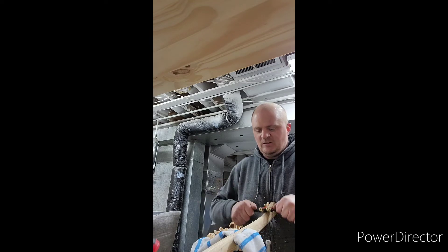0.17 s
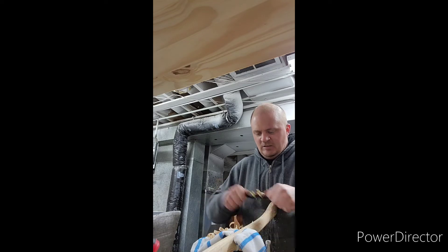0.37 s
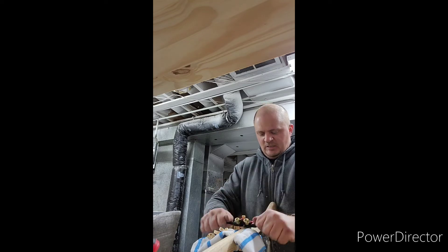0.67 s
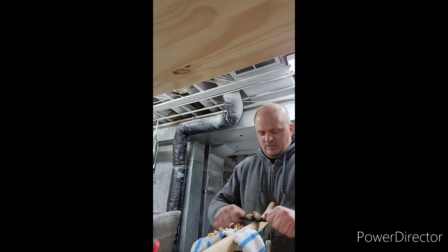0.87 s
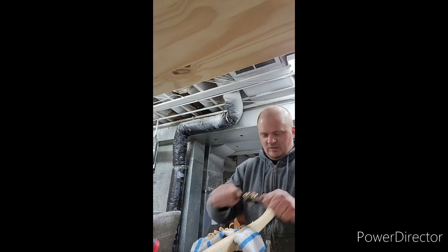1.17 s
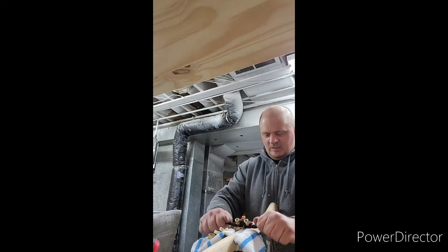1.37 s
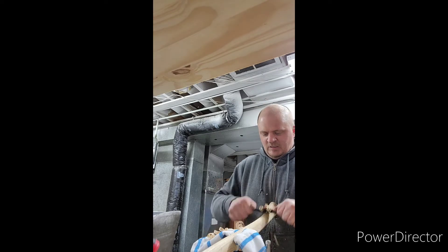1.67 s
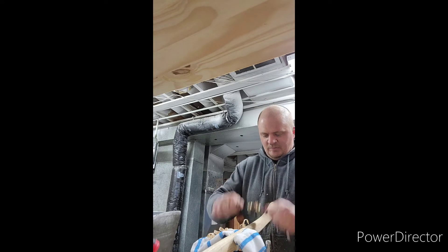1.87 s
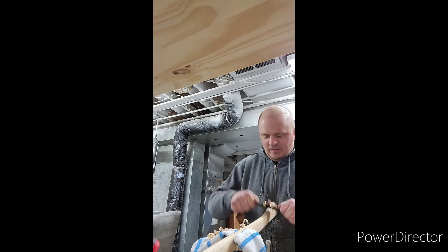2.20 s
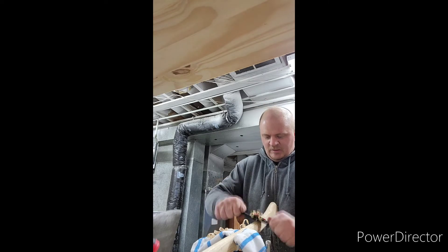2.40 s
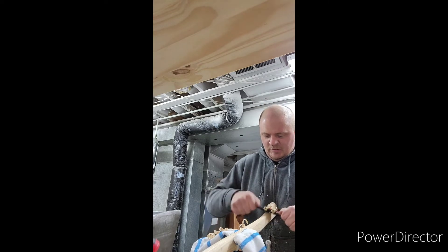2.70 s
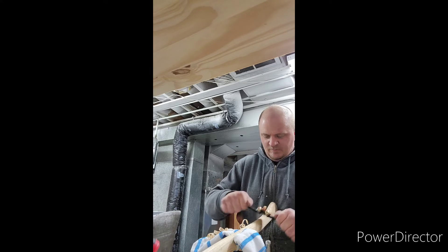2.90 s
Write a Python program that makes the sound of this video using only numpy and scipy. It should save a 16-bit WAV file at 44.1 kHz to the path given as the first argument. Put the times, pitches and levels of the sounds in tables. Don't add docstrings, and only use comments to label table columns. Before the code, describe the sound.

Woodworking scrapes: a hand shave clunks down, then hisses and catches on a clamped wooden handle.

```python
import sys
import numpy as np
from scipy import signal
from scipy.fft import rfft, irfft, next_fast_len
from scipy.io import wavfile

SR = 44100
rng = np.random.default_rng(int(sys.argv[2]) if len(sys.argv) > 2 else 0)


def wav_out(sig):
    wavfile.write(sys.argv[1], SR, np.round(np.clip(np.atleast_2d(sig).T, -1, 1) * 32767).astype(np.int16))


def decibels_to_gain(level_db):
    exponent = np.asarray(level_db, float) / 20
    return 10 ** exponent


N = 134505

# pitch_hz, level_db, t60_s
TOOL_MODES = [(716.3, -6.5, 0.053), (870, -3, 0.022), (1126, 0, 0.021), (1390, -6.5, 0.034),
              (1670, -11, 0.099), (1983, -16.5, 0.016), (2370, -9, 0.044), (2820, 1.5, 0.055),
              (3060, -1.5, 0.052), (3300, -19.5, 0.035), (3650, -9.5, 0.085), (4200, -13, 0.034),
              (4830, -25.5, 0.15), (6740, -38, 0.06)]


def rms_one(x):
    return x / np.sqrt(np.mean(x ** 2) + 1e-20)


def at_hz(points, hz):
    points = np.array(points)
    return np.interp(np.log(hz + 1), np.log(points[:, 0]), points[:, 1])


def coloured(x, spectrum):
    hz = np.fft.rfftfreq(N, 1 / SR)
    low_end = 1 / (1 + (spectrum[0][0] / (hz + 1)) ** 8)
    high_end = 1 / (1 + (hz / spectrum[-1][0]) ** 16)
    return rms_one(irfft(rfft(x) * decibels_to_gain(at_hz(spectrum, hz)) * low_end * high_end, N))


def drift(rate_hz):
    r = np.exp(-2 * np.pi * rate_hz / SR)
    noise = rng.standard_normal(N + SR)
    return rms_one(signal.lfilter([1], [1, -2 * r, r * r], noise)[SR:])


def ring(clicks, hz, t60_s):
    r, w = decibels_to_gain(-60 / (t60_s * SR)), 2 * np.pi * hz / SR
    return signal.lfilter([0, np.sin(w)], [1, -2 * r * np.cos(w), r * r], clicks + 1e-18)


def swell(start_s, level_db, pitch_hz, t60_s, rise_s):
    out, t = np.zeros(N + SR), np.arange(SR // 4) / SR
    for start, db, hz, t60 in np.broadcast(start_s, level_db, pitch_hz, t60_s):
        envelope = decibels_to_gain(db - 60 * t / t60) * (1 - np.exp(-(t / rise_s) ** 2))
        out[int(start * SR):][:len(t)] += envelope * np.sin(2 * np.pi * hz * t)
    return out[:N]


def wide(x):
    likeness = 0.15
    mid = np.sqrt(1 + likeness) * x[0]
    side = np.sqrt(1 - likeness) * x[1] * np.array([[1], [-1]])
    return (mid + side) / np.sqrt(2)


def air():
    # pitch_hz, level_db
    murmur_spectrum = [(30, -6), (140, -1), (900, -22.5), (1100, -29.5), (3300, -34), (6000, -43),
                       (9500, -74.5), (15500, -56)]
    # pitch_hz, likeness (0-1)
    likeness = [(60, 0.84), (240, 1), (950, 0.42), (3770, 0.03), (15000, 0.6)]
    hz = np.fft.rfftfreq(N, 1 / SR)
    alike = np.clip(at_hz(likeness, hz), 0, 1)
    mid, side = rfft(rng.standard_normal((2, N)))
    pair = np.sqrt(1 + alike) * mid + np.sqrt(1 - alike) * side * [[1], [-1]]
    noise = rfft(coloured(irfft(pair, N), murmur_spectrum))
    octave = np.clip(np.log2(hz / 40 + 1e-3), 0, 8)
    murmur = 0
    for k in range(9):
        band = np.clip(1 - np.abs(octave - k), 0, 1)
        murmur = murmur + irfft(noise * band, N) * decibels_to_gain(2.0 * drift(5.0))
    whistle = rms_one(ring(rng.standard_normal(N), 1668, 0.15))
    return decibels_to_gain(-42.5) * murmur + whistle * decibels_to_gain(-74.5 + 3.0 * drift(3.0))


def strokes():
    # start_s, length_s, level_db, fizz_db
    slides = [(-.1, 0.25, -44.5, -58.5), (0.056, 0.062, -51.5, -52), (0.202, 0.043, -33, -37),
              (0.226, 0.082, -43.5, -52), (0.317, 0.06, -52, -64), (0.449, 0.46, -56, -73),
              (0.765, 0.22, -49, -58), (0.96, 0.17, -43.5, -49), (1.429, 0.27, -48.5, -62.5),
              (1.607, 0.23, -45, -58), (2.067, 0.16, -53.5, -81.5), (2.125, 0.21, -45, -60.5),
              (2.524, .13, -47, -82), (2.625, 0.14, -41.5, -53), (2.717, 0.16, -55, -75)]
    rise_share = 0.56
    t, out = np.arange(N) / SR, np.zeros((2, N))
    for start, length, db, fizz_db in slides:
        u = (t - start) / length
        pressure = np.clip(np.minimum(u / rise_share, (1 - u) / (1 - rise_share)), 0, 1)
        out += decibels_to_gain([[db], [fizz_db]]) * pressure
    return out


def shaving(weight, fizz):
    # pitch_hz, level_db
    hiss_spectrum = [(300, 1.5), (700, -2.5), (1400, -8.5), (2200, -12), (3000, -7), (5000, -12),
                     (7700, -21), (8300, -43)]
    # pitch_hz, level_db
    fizz_spectrum = [(8000, -11), (10500, -13.5), (12000, -4), (13500, -5.5), (15600, 6.5)]
    grains_per_s, grain_spread_db = 1800, 2.65
    grains = (rng.random((2, N)) < grains_per_s / SR).astype(float)
    grains *= decibels_to_gain(grain_spread_db * np.minimum(rng.exponential(1, (2, N)), 4))
    grains *= rng.choice([-1, 1], (2, N))
    grains = rms_one(grains) + 1.2 * rng.standard_normal((2, N))
    sing = 0
    for hz, _, t60 in TOOL_MODES[2:-2]:
        patches = decibels_to_gain(4 * drift(5.0) + at_hz(hiss_spectrum, hz))
        sing = sing + rms_one(ring(grains[0], hz, 0.5 * t60)) * patches
    hiss = wide(coloured(grains, hiss_spectrum)) + decibels_to_gain(-4) * rms_one(sing)
    shaved = weight * decibels_to_gain(2.0 * drift(21)) * hiss
    return shaved + fizz * decibels_to_gain(2.2 * drift(28)) * wide(coloured(grains, fizz_spectrum))


def songs():
    # start_s, length_s, from_hz, to_hz, level_db
    streaks = [(-.02, 0.037, 3980, 3980, -40), (.015, 0.037, 3720, 3710, -43),
               (.05, 0.062, 1844, 1770, -43), (.06, 0.056, 4810, 4680, -51), (.0, 0.056, 2850, 2900, -49),
               (.72, 0.13, 4740, 4820, -64), (.77, 0.091, 2620, 2480, -57), (.86, 0.075, 4700, 4830, -55),
               (.88, .1, 2980, 2970, -42), (.96, .13, 3000, 2760, -61), (1.52, 0.14, 2650, 2790, -46),
               (1.58, 0.16, 2940, 3050, -43.5), (1.53, 0.14, 4790, 4750, -55),
               (1.62, 0.13, 3700, 3680, -51), (1.69, 0.048, 4830, 4670, -55.5),
               (1.63, 0.1, 1390, 1390, -53), (1.69, 0.075, 2860, 2680, -50), (1.78, 0.088, 4130, 4130, -66),
               (2.1, 0.13, 1672, 1680, -48.5), (2.515, 0.033, 7100, 7260, -51.5),
               (2.59, 0.054, 7200, 7200, -63), (2.7, 0.084, 4700, 4830, -63),
               (2.8, 0.13, 1650, 1668, -59.5)]
    width_hz = 80
    t, out = np.arange(N) / SR, np.zeros(N)
    sway, skew = 0.8 * drift(width_hz), 0.8 * drift(width_hz)
    for k, (start, length, from_hz, to_hz, db) in enumerate(streaks):
        u = np.clip((t - start) / length, 0, 1)
        phase = 2 * np.pi * np.cumsum(from_hz + (to_hz - from_hz) * u) / SR
        shift = k * SR // 7
        waver = np.sin(phase) * (0.78 + np.roll(sway, shift)) + np.cos(phase) * np.roll(skew, shift)
        out += decibels_to_gain(db) * np.sqrt(np.sin(np.pi * u).clip(0)) * waver
    return out


def bench(weight):
    # start_s, peak_db, hardness_db_per_octave, sway_db
    jolts = [(0.09, -27.5, -14, -33), (0.219, -0.5, 3.5, -34), (0.227, -7, -0.5, -30),
             (0.665, -12.5, 2, -14.5), (0.714, -24.5, 1.5, -36), (0.834, -26, -13.5, -28),
             (1.04, -26.5, -3, -21), (1.051, -15, -3.5, -41), (1.066, -17.5, 2, -32), (1.39, -12, -1, -48),
             (1.405, -13.5, 0.5, -18.5), (1.586, -27, -11, -28), (1.73, -16.5, -6, -46),
             (1.762, -13, 1.5, -43), (2.025, -10.5, 0, -19), (2.083, -8.5, 0.5, -25),
             (2.204, -13.5, -6.5, -24), (2.249, -15, -5.5, -51), (2.278, -16.5, 0.5, -23),
             (2.516, -10, -4, -13), (2.545, -36, 12, -19.5), (2.677, -22, -4, -42), (2.696, -26, -17, -37),
             (2.756, -19.5, -10, -48), (2.789, -16.5, -3.5, -33), (3.041, -20.5, -1, -2.5)]
    # pitch_hz, level_db, t60_s
    bench_modes = [(62.2, -10.5, 0.51), (78.8, -10.5, 0.3), (108.4, 5.5, 0.1), (137.7, 1.5, 0.13),
                   (180.3, -8.5, 0.21), (209.2, -4.5, 0.1), (303.6, -4, 0.067), (357, -4.5, 0.042),
                   (416.7, -12, 0.086), (513, -6, 0.053), (598, -16, 0.039)]
    push_s = 0.00747
    colour = rng.normal(0, 1, (len(jolts), len(bench_modes)))
    late = rng.random((len(jolts), len(bench_modes)))
    start, db, hardness_db, sway_db = np.transpose(jolts)
    at, shoves = (start * SR).astype(int), np.zeros(N)
    shoves[at] = decibels_to_gain(sway_db)
    slow_rise = signal.butter(2, 22.9, fs=SR, output="sos")
    sway = signal.sosfilt(slow_rise, ring(shoves, 31, 0.18))
    rub = rng.standard_normal(N) * weight * decibels_to_gain(-18.5 + drift(26))
    out = 0
    for k, (hz, level_db, t60) in enumerate(bench_modes):
        pushes = rub * decibels_to_gain(level_db - 4.8 * np.log2(hz / 100))
        push_db = db - 8.0 + level_db + 3.16 * colour[:, k] + hardness_db * np.log2(hz / 130)
        pushes[np.minimum(at + (late[:, k] * push_s * SR).astype(int), N - 1)] += decibels_to_gain(push_db)
        out += ring(pushes, hz, t60)
    return sway + signal.sosfilt(signal.butter(2, [60, 700], "band", fs=SR, output="sos"), out)


def knocks():
    # start_s, peak_db, favoured_hz, dullness (0-1)
    hits = [(0.093, -48, 1710, 0), (.136, -36, 1390, 1), (.189, -26.5, 2370, 0.62), (0.213, -26.5, 3060, 0),
            (.222, -14, 1390, 0.34), (.231, -10.5, 2870, 0.36), (.261, -22, 3300, 0.7),
            (0.661, -11, 2435, 0.3), (1.031, -39.5, 4200, 0.4), (1.388, -15, 1119, 0.1),
            (1.592, -30, 1670, 0.14), (1.64, -33.5, 1390, 0.7), (1.734, -28, 1140, 1),
            (1.776, -26.5, 2820, 0.65), (2.023, -15.5, 1172, 0.34), (2.066, -31, 3300, 0.8),
            (2.087, -19.5, 870, 0.83), (2.113, -24, 2370, 0.4), (2.185, -27.5, 1400, 0.83),
            (2.235, -31, 2820, 0.67), (2.292, -21.5, 3060, 0.48), (2.515, -11, 3650, 0.3),
            (2.56, -22.5, 1390, 0.74), (2.604, -24.5, 2370, 0.03), (2.686, -23.5, 2820, 0),
            (2.752, -30.5, 2820, 0.15), (2.234, -27.5, 3650, 0.2), (2.072, -33, 1280, 1),
            (2.779, -26, 2370, 0.47), (3.044, -16, 2820, 0.76), (2.013, -31.5, 1120, 0.3),
            (2.282, -36, 924, 0.6), (2.518, -14, 1148, 0.74), (2.026, -17.5, 1140, 1),
            (2.25, -30, 1280, 0.7), (.68, -22, 1670, 0.87)]
    # pitch_hz, level_db
    favour = [(800, -9.5), (1200, -0.5), (2800, 1.5), (4200, 12.5)]
    # pitch_hz, level_db (per Hz)
    crack_spectrum = [(400, -8.5), (1200, -5.5), (3500, -12), (7500, -30.5), (8500, -64), (11000, -44),
                      (15700, -38.5)]
    rattle_s, lead = 0.014, 0.45
    dull_db_per_octave, crack_db, crack_t60_s = 6.5, -24, 0.057
    start, db, favoured_hz, dull = np.transpose(hits)

    when, size = rng.random((len(hits), 12)), rng.normal(0, 1, (len(hits), 12))
    size = size * np.minimum((when / lead) ** 2, (1.2 - when) / (1.2 - lead))
    when = rattle_s * (when - lead)
    at = np.minimum(((start[:, None] + when) * SR).astype(int), N - 1)
    out = np.zeros(N)
    for k, (hz, level_db, t60) in enumerate(TOOL_MODES):
        clicks = np.zeros(N)
        gain = decibels_to_gain(db - 6 + level_db - dull_db_per_octave * dull * np.log2(hz / 1200))
        summed = np.abs(np.sum(size * np.exp(2j * np.pi * hz * at / SR), axis=1)) + 0.5
        np.add.at(clicks, at, (gain / summed)[:, None] * size)
        out += ring(clicks, hz, t60) * (-1) ** k

    swell_s = 0.003876
    favoured_db = db + 3 + at_hz(favour, favoured_hz)
    favoured_db = favoured_db - dull_db_per_octave * dull * np.log2(favoured_hz / 1200)
    favoured_t60_s = 0.049 * np.sqrt(1200 / favoured_hz)
    out += swell(start - swell_s / 2, favoured_db, favoured_hz, favoured_t60_s, swell_s)

    cracks, share = np.zeros((2, N)), np.clip(dull, 0, 1)[:, None]
    crack_size = decibels_to_gain(db + crack_db)[:, None] * np.abs(size)
    np.add.at(cracks[0], at, crack_size * (1 - share))
    np.add.at(cracks[1], at, crack_size * share)
    cracks[0, (start * SR).astype(int)] += decibels_to_gain(db - 12.5) * (1 - share[:, 0])
    bright, dark = signal.lfilter([1], [1, -decibels_to_gain(-60 / (crack_t60_s * SR))], cracks)
    noise = wide(coloured(rng.standard_normal((2, N)), crack_spectrum))
    return out + bright * noise + signal.lfilter(*signal.butter(2, 1800, fs=SR), dark * noise)


def thuds():
    # start_s, peak_db, pitch_hz, t60_s
    clamp_thuds = [
        (0.22, -1.5, 325, 0.076),
        (.23, -8, 398, 0.054),
        (0.238, -24, 306, 0.051),
        (1.063, -40, 402, 0.043),
        (1.765, -25, 483, .04),
        (1.744, -25, 253, 0.05),
        (2.085, -11.5, 286.3, 0.076),
        (2.217, -17, 131.4, .2),
        (2.279, -27.5, 567, 0.061),
        (2.518, -19.5, 744, 0.033),
    ]
    return swell(*np.transpose(clamp_thuds), 0.0038)


def fibre_snap():
    click = np.zeros(N)
    click[int(2.035 * SR)] = decibels_to_gain(-19)
    return ring(click, 4560, 0.0073)


def ports_and_room(x, left_lag_s):
    # pitch_hz, left_over_right_db
    lean = [(60, 1.5), (180, -1), (350, 0), (700, -6), (1650, -1.5), (4970, -3.5), (9000, 12.5), (15000, 0)]
    room_t60_s, wall_cut_hz, room_low_hz = 0.42, 1780, 270
    size = next_fast_len(N + SR)
    hz, spectrum = np.fft.rfftfreq(size, 1 / SR), rfft(x, size)
    half = decibels_to_gain(at_hz(lean, hz) / 2)
    lag_s = left_lag_s / (1 + (400 / (hz + 1)) ** 2)
    direct = np.array([half * np.exp(-2j * np.pi * hz * lag_s), 1 / half])
    room = np.zeros((2, len(hz)), complex)
    thin = decibels_to_gain(-9.5) / (1 + (room_low_hz / (hz + 1)) ** 2)
    for k, lag in enumerate(rng.uniform(0.0065, 0.04, 16)):
        loss = decibels_to_gain(-60 * lag / room_t60_s * (2.0 + hz / wall_cut_hz))
        loop = loss * np.exp(-2j * np.pi * hz * lag)
        room[k % 2] += thin * loop / (1 - loop) * (-1) ** (k // 2)
    return irfft(direct * spectrum + room * spectrum[::-1], size)[:, :N]


def scene():
    weight, fizz = strokes()
    tool = knocks() + fibre_snap() + songs() + shaving(weight, fizz)
    wood = bench(weight) + thuds()
    wood = wood * decibels_to_gain([[-0.5], [0.5]])
    return ports_and_room(tool, 0.00017) + ports_and_room(wood, 0.00045) + air()


def top_cut(x):
    return signal.sosfilt(signal.butter(12, 15880, fs=SR, output="sos"), x)


def record(dry):
    rounded = np.tanh(dry)
    mix = signal.sosfilt(signal.cheby2(10, 45, 16000, fs=SR, output="sos"), rounded)
    return top_cut(mix)


dry = scene()
out = record(dry)
wav_out(out)
```